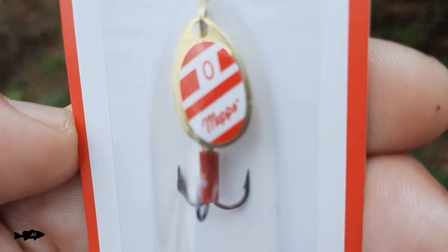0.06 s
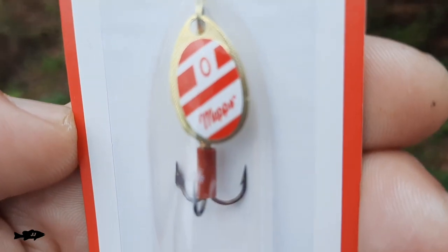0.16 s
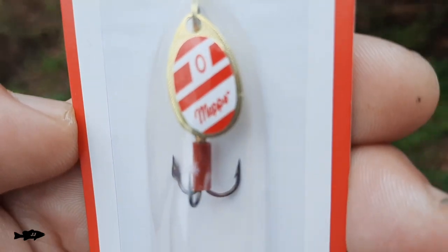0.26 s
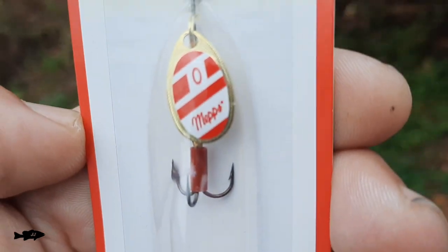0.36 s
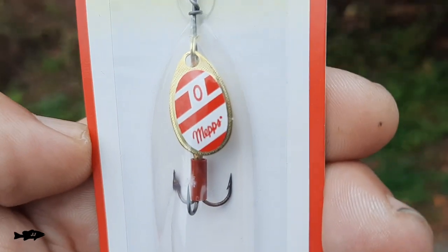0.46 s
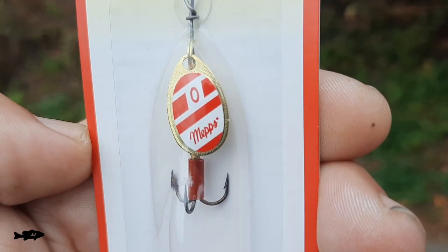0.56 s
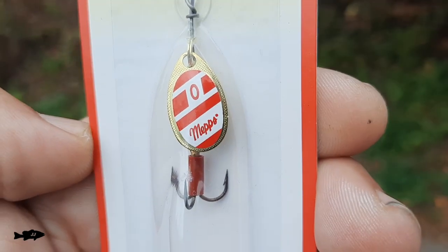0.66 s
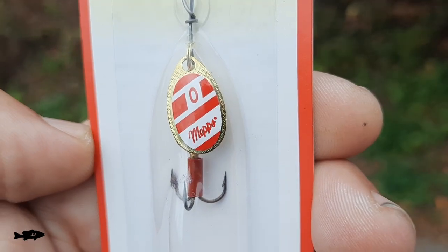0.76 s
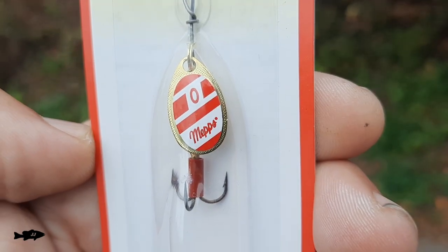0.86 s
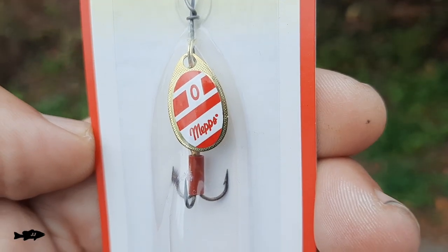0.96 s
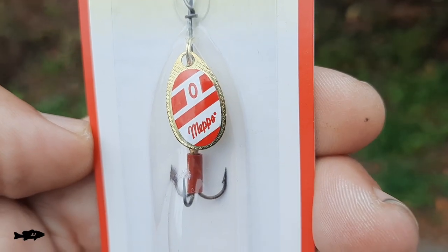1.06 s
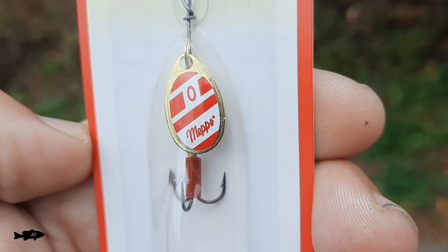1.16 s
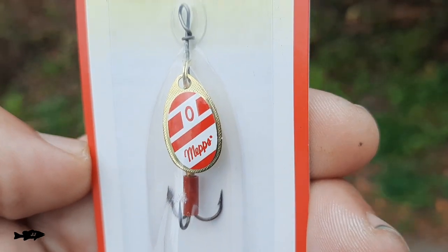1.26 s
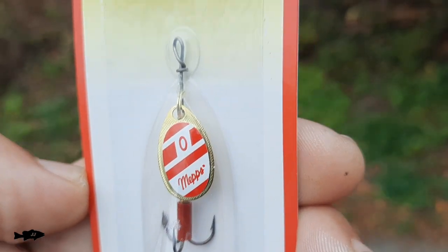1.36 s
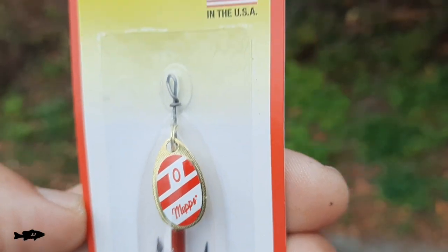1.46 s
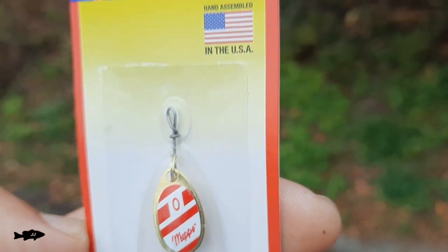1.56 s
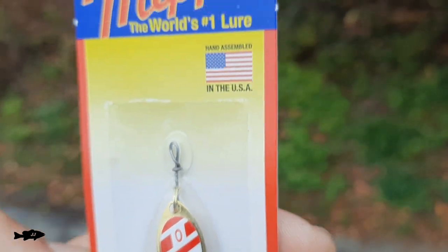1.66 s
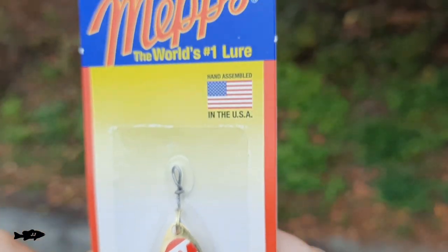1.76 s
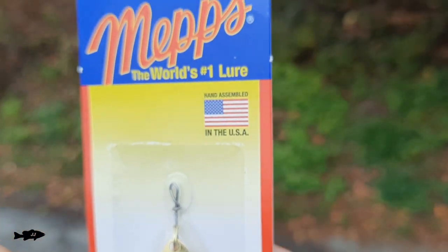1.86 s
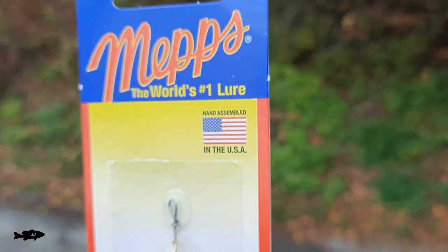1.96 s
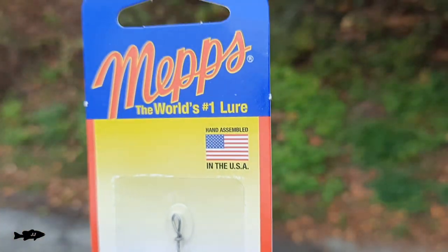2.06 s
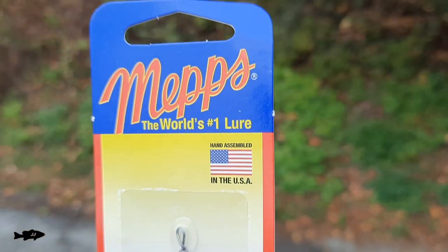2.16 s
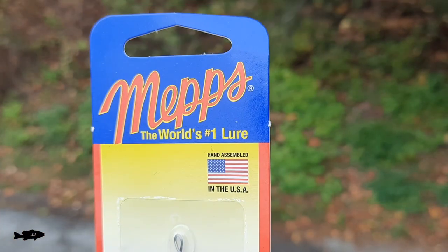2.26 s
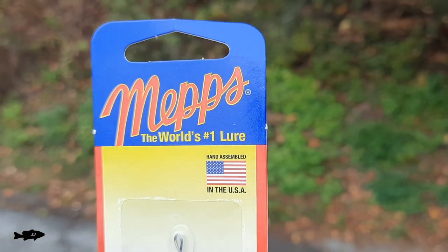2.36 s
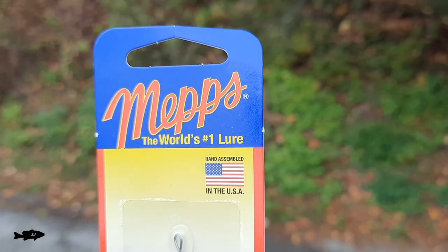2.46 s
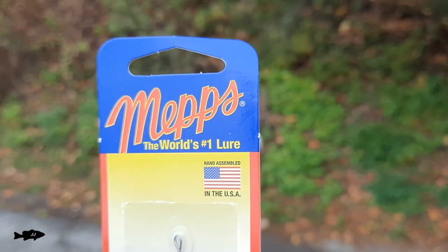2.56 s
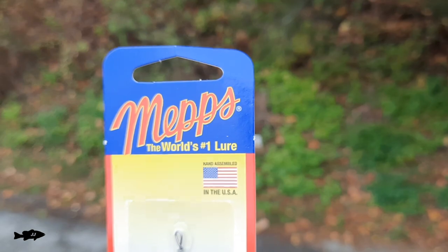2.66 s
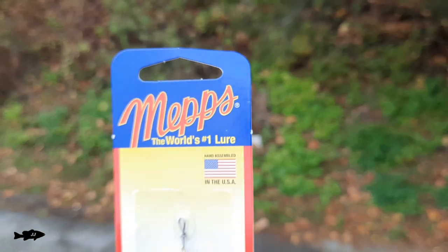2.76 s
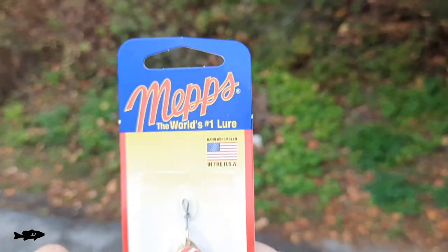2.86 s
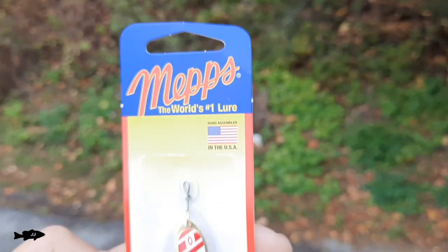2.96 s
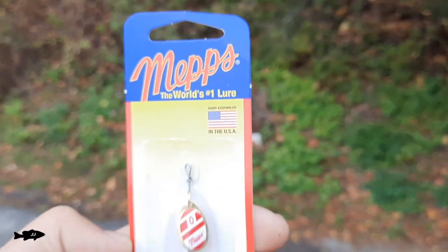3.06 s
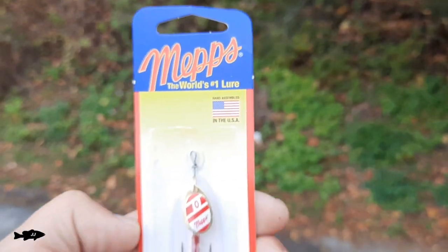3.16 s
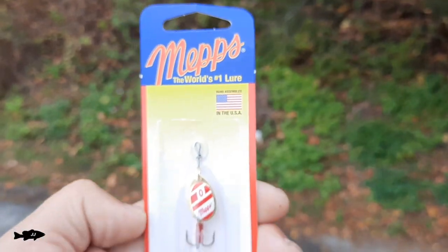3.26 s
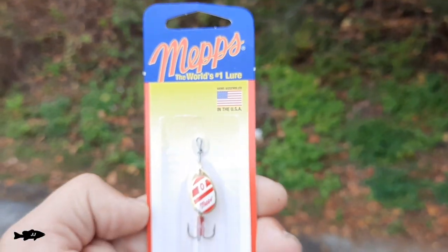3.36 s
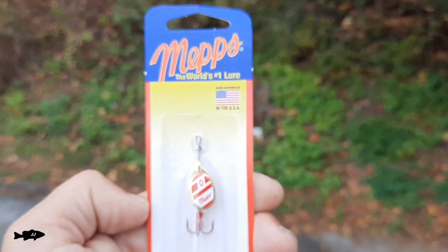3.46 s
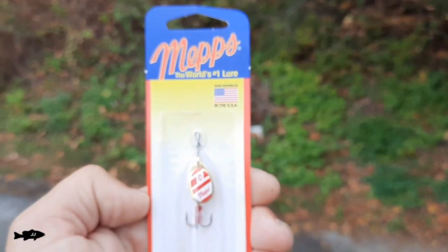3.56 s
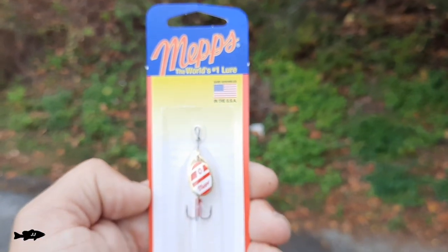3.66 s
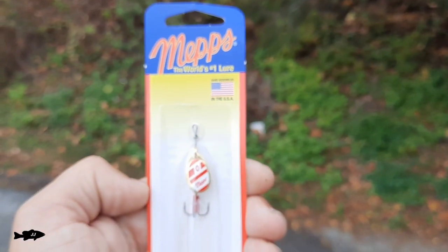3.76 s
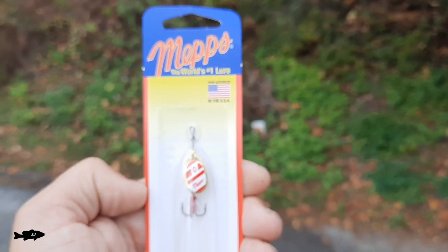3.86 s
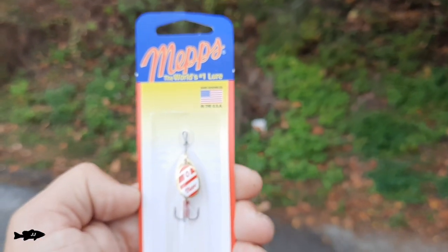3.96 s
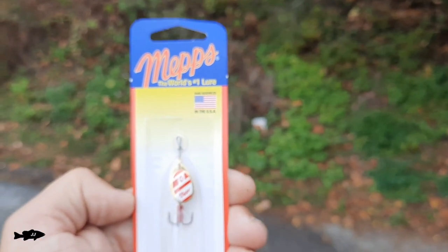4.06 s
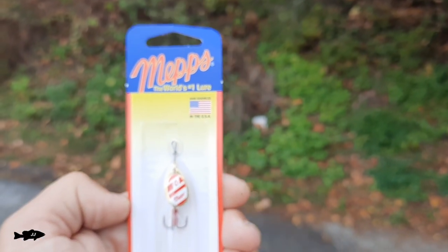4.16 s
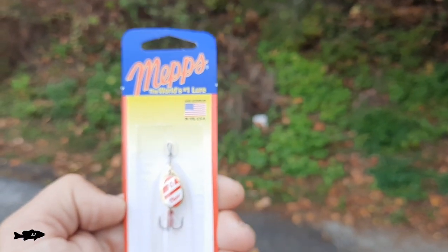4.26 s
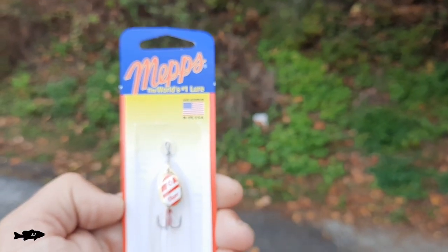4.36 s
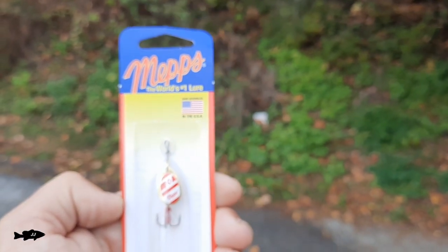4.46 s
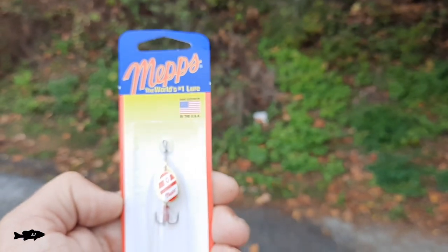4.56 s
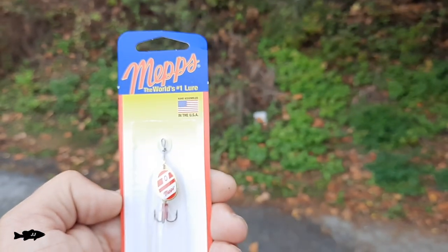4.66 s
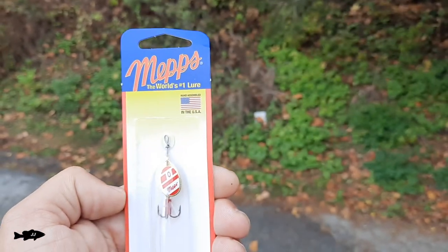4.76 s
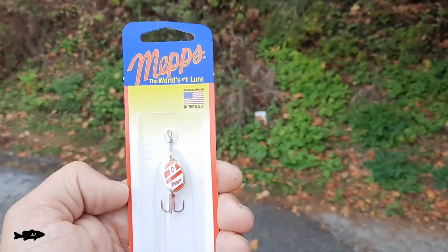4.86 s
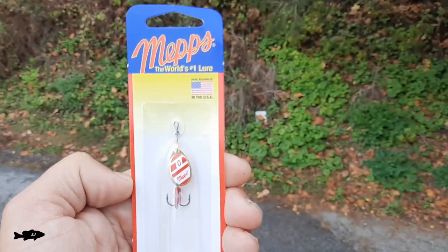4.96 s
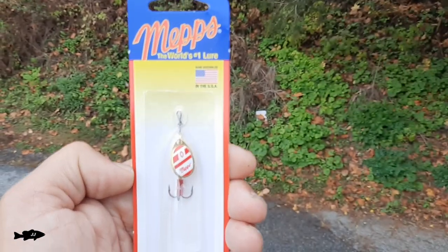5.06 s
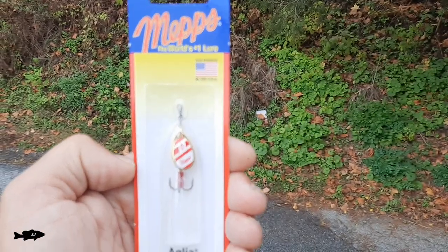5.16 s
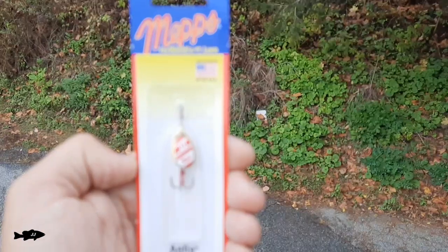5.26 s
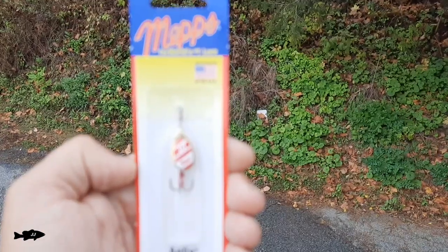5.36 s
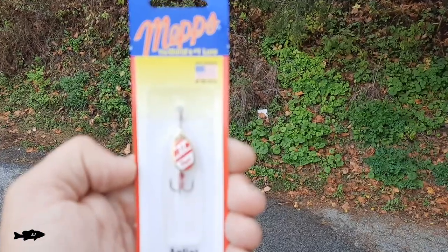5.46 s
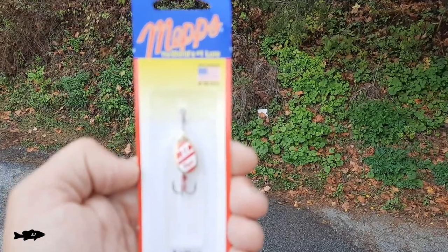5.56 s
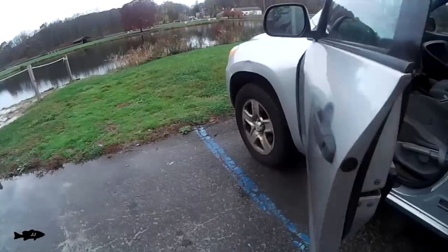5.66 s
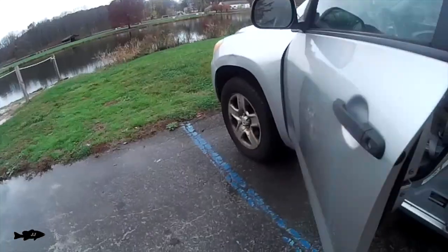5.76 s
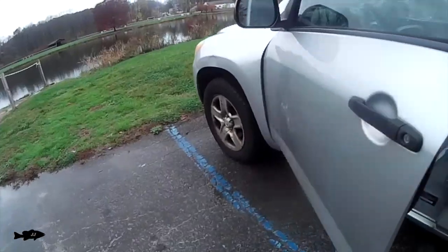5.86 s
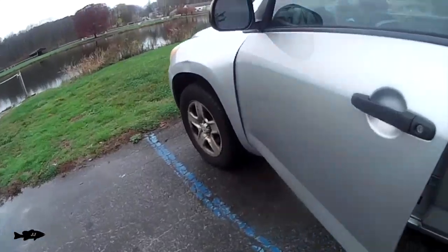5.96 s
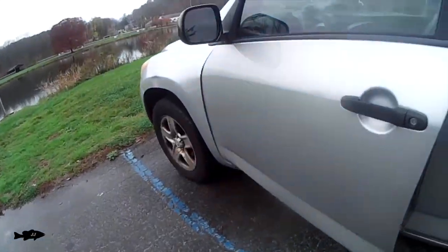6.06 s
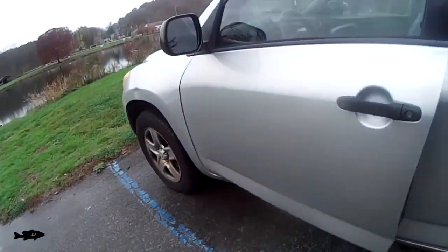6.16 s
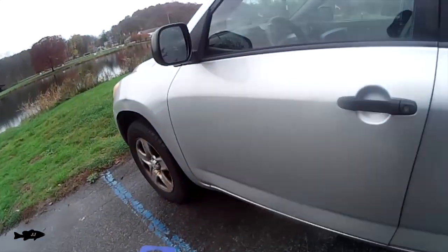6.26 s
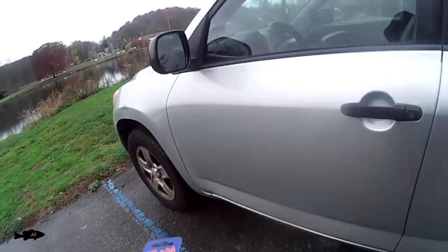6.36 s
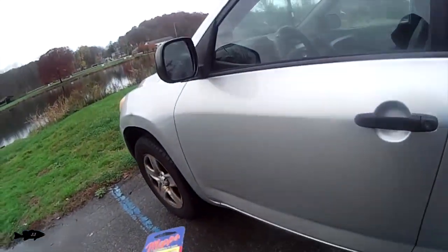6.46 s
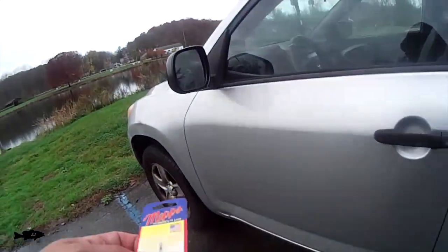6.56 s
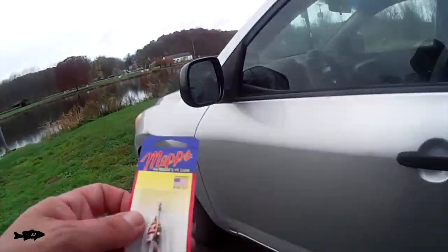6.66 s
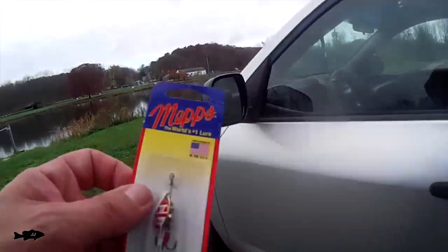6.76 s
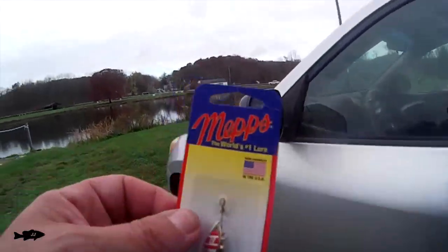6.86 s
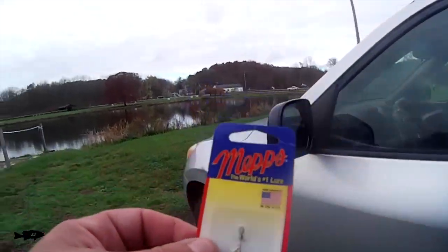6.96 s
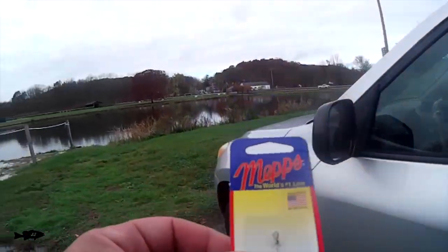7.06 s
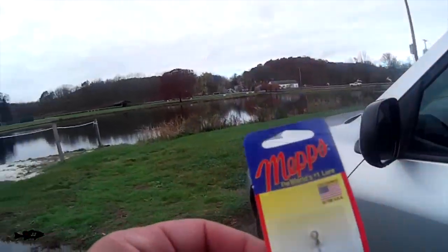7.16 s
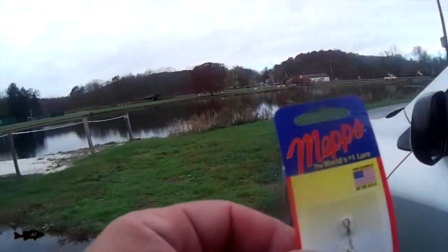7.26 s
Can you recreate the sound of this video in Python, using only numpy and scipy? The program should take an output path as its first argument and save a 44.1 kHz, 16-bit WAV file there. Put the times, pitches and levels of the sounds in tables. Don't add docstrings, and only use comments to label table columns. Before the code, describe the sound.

Tyre roar swells and fades over distant traffic and faint crickets, then cuts to a hushed car park with a loud, clipping door slam.

```python
import sys
import numpy as np
from scipy import signal
from scipy.fft import rfft, irfft, next_fast_len
from scipy.io import wavfile
from scipy.ndimage import uniform_filter1d, map_coordinates

SR = 44100
rng = np.random.default_rng(int(sys.argv[2]) if len(sys.argv) > 2 else 0)


def materialize(psi):
    bounded = np.clip(np.atleast_2d(psi).T, -1, 1)
    quanta = np.round(bounded * 32767).astype(np.int16)
    wavfile.write(sys.argv[1], SR, quanta)


def boost_factor(decibels):
    exponent = np.asarray(decibels, float) / 20
    return 10 ** exponent


N = 322659


def unit(x):
    return x / np.sqrt(np.mean(x ** 2) + 1e-20)


def along(points, hz, axis=1):
    p = np.array(points)
    return np.interp(np.log(hz + 1), np.log(p[:, 0] + 1), p[:, axis])


def curve(points):
    return np.interp(np.arange(N) / SR, *np.transpose(points))


def wobble(rate):
    knots = rng.standard_normal(int(N * rate / SR) + 4)
    return map_coordinates(knots, [np.arange(N) * rate / SR])


def filtered(x, response):
    m = next_fast_len(x.shape[-1] + 8192)
    return irfft(rfft(x, m) * response(np.fft.rfftfreq(m, 1 / SR)), m)[..., :x.shape[-1]]


def add(track, s, piece):
    part = track[..., round(s * SR):][..., :piece.shape[-1]]
    part += piece[..., :part.shape[-1]]


# Hz, direct sound 0-1, scattered sound 0-1.
LIKENESS = [(80, 1, 0.87), (404, 0.78, 0.97), (633, 0.45, 0.03), (1280, 1, 0.16), (1890, 0.58, 0),
            (5000, 0.45, 0.3), (9000, 0, 0), (14000, .1, 0.1)]


def rush(spectrum, direct, patchy_db, away=None, going=((0, 0),)):
    hz, t, z = signal.stft(rng.standard_normal((2, N)), SR, nperseg=1024)
    patches = uniform_filter1d(rng.standard_normal(z.shape[1:]), size=8, axis=0)
    patches = uniform_filter1d(patches, size=7, axis=1)
    share = np.clip(np.interp(t, *np.transpose(direct)), 0, 1)
    alike = along(LIKENESS, hz)[:, None] * share
    alike += along(LIKENESS, hz, axis=2)[:, None] * (1 - share)
    turn = np.arccos(np.clip(alike, 0, 1)) / 2
    gone = np.clip(np.interp(t, *np.transpose(going)), 0, 1)
    colour_db = np.outer(along(spectrum, hz), 1 - gone) + np.outer(along(away or spectrum, hz), gone)
    colour = boost_factor(colour_db)
    colour /= np.linalg.norm(colour, axis=0)
    mid, side = z * colour * boost_factor(patchy_db * unit(patches)) * [np.cos(turn), np.sin(turn)]
    return unit(signal.istft(np.array([mid + side, mid - side]), SR, nperseg=1024)[1][:, :N])


# Hz, share of the full lag 0-1.
PHONE_LAG = [(100, 0.2), (430, 0.4), (600, 0.91), (1000, 1.07), (1700, 0.96)]
# Hz, left over right in dB.
PHONE_SHADE = [(60, 0), (92, -2.5), (140, -0.5), (210, -0.5), (330, -0.5), (500, 6.5), (770, 1), (1170, 1),
               (1790, -2.5), (2740, 0.5), (4190, 1.5), (6410, 5), (9810, 1), (15000, 0)]


def phone(x, lag_s):
    def half(f):
        shade = along(PHONE_SHADE, f) / 2 * np.log(10) / 20
        return shade - 1j * np.pi * f * lag_s * along(PHONE_LAG, f)
    return filtered(x, lambda f: np.exp([half(f), -half(f)]))


# Hz, dB per Hz.
TRAFFIC_COLOUR = [(24, -46), (40, -12), (91, -1), (396, -9.5), (606, -13), (797, 1.5), (1130, -7),
                  (1860, -9), (3220, -23.5), (3560, -22.5), (4130, -28), (6000, -33.5), (9400, -44),
                  (12400, -41.5), (15500, -57)]


def far_traffic():
    return phone(boost_factor(-56.5) * rush(TRAFFIC_COLOUR, [(0, 0.31)], patchy_db=2.0), lag_s=-0.000537)


# Hz, dB per Hz.
INPUT_COLOUR = [(6000, -24), (9000, -10), (11000, -1), (13000, 2), (15600, 6)]
# time in seconds, level in dB.
INPUT_DB = [(0, -100), (1.5, -92), (3, -81), (4, -80), (5.6, -79)]


def input_hiss():
    return boost_factor(curve(INPUT_DB)) * rush(INPUT_COLOUR, [(0, 0), (8, 0.0047)], patchy_db=0.8)


# chirp period in seconds, chirp length in seconds, pitch in Hz, left over right in dB,
# pitch sag at the chirp ends 0-1.
CRICKETS = [
    (.0978, .035, 5950, 6, .06),
    (.0913, .03, 6120, 6, .07),
    (.09134, .025, 6450, 3, .08),
    (.0979, .028, 6050, 3, .06),
    (.0422, .038, 3480, 0, .006),
    (.02, .03, 3900, 0, .12),
    (.0418, .046, 3480, 0, .004),
]
# cricket index, start in seconds, end in seconds, level in dB at start, level in dB at end.
CHIRP_BOUTS = [(0, .083, 1.3, -85, -75), (1, .07, 1.3, -85, -75), (2, 3.054, 5.1, -66, -68),
               (2, 5.155, 5.6, -74, -73), (3, 3.232, 5.6, -71.5, -73), (6, 0, .01, -72, -72),
               (6, .032, .36, -71.5, -77), (6, .369, .38, -73, -73), (4, 4.961, 5.03, -65, -64),
               (4, 5.043, 5.45, -61, -61), (5, 4.235, 4.27, -66, -65)]


def crickets():
    out = np.zeros((2, N))
    teeth_hz, teeth_depth = 140, 0.31
    for cricket, start, end, first_db, last_db in CHIRP_BOUTS:
        period, length, hz, pan_db, sag = CRICKETS[cricket]
        t = np.arange(round(length * SR)) / SR
        swell = np.sin(np.pi * t / length)
        sides_db = np.array([[pan_db / 2], [-pan_db / 2]])
        for s in np.arange(start, end, period):
            scatter = rng.standard_normal(3)
            rasp = 1 + teeth_depth * np.sin(2 * np.pi * teeth_hz * t + 2 * scatter[2])
            pitch_hz = hz * (1 + 0.003 * scatter[0] - sag * (1 - swell))
            db = np.interp(s, [start, end], [first_db, last_db]) + 1.2 * scatter[1]
            chirp = rasp * swell ** 2 * np.sin(2 * np.pi * np.cumsum(pitch_hz) / SR)
            add(out, s, boost_factor(db + sides_db) * chirp)
    return out


# time in seconds, level in dB.
NEARNESS_DB = [(0, -68.5), (.5, -67), (.95, -56), (1.45, -46.5), (1.8, -43.5), (2.0, -42.5), (2.2, -37.5),
               (2.35, -37.5), (2.6, -39), (2.85, -40), (3.1, -41.5), (3.7, -44), (4.1, -43.5), (4.45, -46),
               (4.65, -48), (5.1, -50), (5.6, -52)]
# time in seconds, share 0-1.
DIRECT_SHARE = [(0, 0.4), (1, 0.71), (2.8, 0.68), (3.3, 0.35), (5.6, 0)]
# time in seconds, share 0-1.
TURNED_AWAY = [(0, 0.32), (2, 0.05), (3.1, 0.36)]
# time in seconds, share 0-1.
AIR_DULLING = [(0, 0.45), (1.4, 0), (1.95, 0.09), (2.249, 0.05), (2.55, 0.05), (3.1, 0.12)]
# Hz, dB per Hz.
RUMBLE = [(20, -34), (40, -19), (70, 10), (110, 11), (150, 3.5), (220, -61)]
BOOM = [(50, -48), (100, -25), (150, -2.5), (250, -4.5), (345, 2.5), (430, -2), (560, -3.5), (680, -10),
        (850, -62)]
ROAR = [(450, -45), (620, -4.5), (800, 0.5), (1050, -6.5), (1400, -7), (1800, -11.5), (2300, -14.5),
        (2900, -22.5), (3600, -46)]
HISS = [(50, -80), (150, -19), (2000, -19), (2700, -5), (3500, 2.5), (4500, -6.5), (6200, -8),
        (7300, -13.5), (8400, -13), (9500, -20), (10800, -18), (12000, -19), (13500, -37), (15500, -47)]
BOOM_BEHIND = [(50, -45), (100, -5), (165, 3), (250, -8), (335, -1), (430, -1), (540, -9), (650, -23),
               (850, -64)]
ROAR_BEHIND = [(480, -59), (650, -13), (770, 6.5), (950, -1.5), (1150, 13), (1260, -3), (1340, -13.5),
               (1700, -5.5), (2300, -17), (2900, -16.5), (3600, -71)]
HISS_BEHIND = [(50, -30), (150, 26), (2000, 32), (2700, 27), (3500, 3), (4500, -10.5), (6200, -20.5),
               (7300, -19), (8400, -28), (9500, -43), (11000, -57), (15500, -50)]
# level over the roar when nearest in dB, swing coming, swing going (dB per dB of nearness),
# unevenness in dB.
NOISE_LAYERS = [
    (-9, 0.67, 1.34, 2),
    (2, 0.88, 1.176, 1.5),
    (3, 0.86, 0.98, 0.7),
    (-15, 0.86, 1.15, 0.84),
]


def car_noise():
    t = np.arange(N) / SR
    near_db = curve(NEARNESS_DB)
    top_db = near_db.max()
    going = t > t[near_db.argmax()]
    spray_db = 3.5 * np.exp(-((t - 2.47) / 0.22) ** 2)
    sources = [(RUMBLE, RUMBLE, TURNED_AWAY, 1.5, 0), (BOOM, BOOM_BEHIND, TURNED_AWAY, 0.21, 0),
               (ROAR, ROAR_BEHIND, TURNED_AWAY, 0.54, 0), (HISS, HISS_BEHIND, AIR_DULLING, 0.86, spray_db)]
    noise = 0
    for (over_db, coming, leaving, uneven_db), source in zip(NOISE_LAYERS, sources):
        colour, behind, turning, patchy_db, extra_db = source
        swing_db = np.where(going, leaving, coming) * (near_db - top_db)
        db = top_db + over_db + swing_db + uneven_db * wobble(9) + extra_db
        noise = noise + boost_factor(db) * rush(colour, DIRECT_SHARE, patchy_db, behind, turning)
    return noise


# time in seconds, peak in dB, pitch in Hz.
CARD_TICKS = [
    (0.5406, -65, 10200),
    (0.767, -62, 7270),
    (1.1272, -65, 8870),
]


def card_ticks():
    out = np.zeros((2, N))
    t = np.arange(200) / SR
    for s, db, hz in CARD_TICKS:
        add(out, s, boost_factor(db + 5 - 60 * t / 0.003) * np.sin(2 * np.pi * hz * t) * np.ones((2, 1)))
    return out


def tone(hz, db, drift_hz, flutter_db):
    level = boost_factor(db + flutter_db * wobble(18)) * np.sqrt(2)
    return level * np.sin(2 * np.pi * np.cumsum(hz + drift_hz * wobble(25.21)) / SR)


def swells(rows, fall_db):
    t = np.arange(N) / SR
    return np.max([db - fall_db * ((t - s) / half) ** 2 for s, half, db in rows], axis=0).clip(-150)


HUM_HZ = 339.8


def doppler_hum_hz():
    shift_hz, abeam_s, sweep_s = 17, 2.9, 1.7
    past_s = np.arange(N) / SR - abeam_s
    return HUM_HZ - shift_hz * past_s / np.hypot(past_s, sweep_s)


# middle in seconds, half length in seconds, level in dB.
HUM_SWELLS = [
    (1.15, 0.091, -56),
    (2.1, 0.086, -37.5),
    (2.5, 0.27, -43),
    (2.85, 0.087, -39.5),
    (3.8, 0.56, -45.5),
    (4.3, 0.21, -42.5),
    (5.0, 0.12, -53),
    (5.55, 0.32, -54),
]


def tyre_hum(hum_hz):
    t = np.arange(N) / SR
    drift_hz = np.interp(t, [3.1, 3.5], [24, 1.5])
    flutter_db = np.interp(t, [3.1, 3.5], [4, 1.1])
    return tone(hum_hz, swells(HUM_SWELLS, fall_db=4.5), drift_hz, flutter_db)


# middle in seconds, half length in seconds, level in dB.
ENGINE_SWELLS = [
    (1.35, 0.17, -56.5),
    (1.96, 0.087, -46.5),
    (2.21, 0.13, -44),
    (2.62, 0.072, -39),
    (3.2, 0.51, -49.5),
    (3.65, 0.073, -53),
    (4.08, 0.094, -51),
]


def engine(hum_hz):
    firing_hz = 69.3 * hum_hz / HUM_HZ + 1.8 * wobble(4)
    return tone(firing_hz, swells(ENGINE_SWELLS, fall_db=6), drift_hz=9, flutter_db=3.5)


# middle in seconds, half length in seconds, level in dB.
WHINE_SWELLS = [
    (1.48, 0.13, -46.5),
    (1.751, 0.09, -49),
]


def tread_whine(hum_hz):
    whine_hz = 422 * hum_hz / hum_hz[round(1.6 * SR)]
    return tone(whine_hz, swells(WHINE_SWELLS, fall_db=6), drift_hz=28, flutter_db=3)


def band(hz, width_hz, db):
    slow = filtered(rng.standard_normal((2, N)), lambda f: np.exp(-(2 * f / width_hz) ** 2))
    turn = 2 * np.pi * np.cumsum(hz) / SR
    return boost_factor(db) * unit(slow[0] * np.cos(turn) + slow[1] * np.sin(turn))


# pitch in Hz, width in Hz, middle in seconds, half length in seconds, level in dB.
GROOVES = [
    (8330, 220, 2.25, .25, -70.5),
    (6250, 380, 2.6, .42, -68),
    (4260, 350, 2.5, 0.39, -69),
    (10500, 350, 2.4, .4, -80),
]


def groove_song(hum_hz):
    glide = (hum_hz / np.interp(2.2, np.arange(N) / SR, hum_hz)) ** 4.5
    out = 0
    for hz, width_hz, *swell in GROOVES:
        out = out + band(hz * glide, width_hz, swells([swell], fall_db=4) + 1.5 * wobble(12))
    return out


# middle in seconds, half length in seconds, level in dB.
GEAR_SWELLS = [
    (4, 0.47, -55.5),
    (4.95, 0.21, -56),
]


def gear_train(hum_hz):
    return tone(hum_hz / 2, swells(GEAR_SWELLS, fall_db=6), drift_hz=4, flutter_db=3)


def car():
    hum_hz = doppler_hum_hz()
    tones = tyre_hum(hum_hz) + engine(hum_hz) + tread_whine(hum_hz) + gear_train(hum_hz)
    return car_noise() + tones + groove_song(hum_hz)


def road():
    x = far_traffic() + input_hiss() + crickets() + phone(car(), lag_s=0.000473) + card_ticks()
    return filtered(x, lambda f: boost_factor(-1.5 * np.exp(-((f - 9530) / 350) ** 2)))


# Hz, dB per Hz.
PARK_COLOUR = [(12, -33), (22, -4), (86, -5), (125, -4.5), (240, -4), (360, -7.5), (520, -12.5),
               (1000, -15.5), (1350, -15.5), (1800, -18), (2200, -27.5), (3500, -33), (11600, -38.5),
               (14500, -38)]


def park_air():
    late_s = np.arange(N) / SR - 6.82
    db = -53 - 5 * late_s.clip(0) + 0.5 * np.exp(-(late_s / 0.037) ** 2)
    return boost_factor(db + 0.26 * wobble(6)) * rush(PARK_COLOUR, [(0, 0.0046), (8, 0.01)], patchy_db=1.55)[0]


def resonant(x, modes):
    def response(f):
        total = 0
        for k, (c, w, db) in enumerate(modes):
            total = total + (-1) ** k * boost_factor(db) * 1j * f * w / (c * c - f * f + 1j * f * w)
        return total
    return filtered(x, response)


# pitch in Hz, width in Hz, level in dB.
CASE_MODES = [(1670, 1200, 5), (2750, 1500, -7), (3950, 680, 3.5), (7800, 2300, -8)]
# time in seconds, peak in dB, brightness in dB.
CARD_CLICKS = [(5.6747, -38.5, -20), (5.6874, -50, -18), (5.9635, -48, -17), (6.7065, -45, -17),
               (6.717, -47, -5), (6.7305, -46.5, 4), (6.7355, -55, 8), (6.746, -59, 5), (6.7785, -57, 3),
               (6.8042, -32, -16), (6.8414, -54, -4), (6.857, -56, -11), (6.8844, -58, -4),
               (6.9074, -57, -9), (6.993, -57, -6)]
# start in seconds, length in seconds, level in dB,
# main ring in Hz, brightness in dB.
CARD_RUBS = [
    (5.935, .032, -56, 1790, -25),
    (6.665, .065, -56, 2800, -13),
    (6.675, .085, -69, 5500, 0),
    (6.78, .14, -77, 4000, 2),
    (6.698, .03, -54, 1700, -10),
    (6.984, .022, -60.5, 3700, -12),
    (6.995, .052, -52, 1700, -13),
    (7.008, .03, -63.5, 7500, 0),
    (7.002, .042, -56.5, 4000, -12),
]
# time in seconds, level in dB, pitch in Hz.
CAMERA_BUMPS = [
    (6.792, -42, 37.4),
    (6.835, -45, 24),
    (6.873, -41, 40),
    (7.25, -47, 40),
    (7.29, -49, 45),
]


def hand():
    knock, bright, rest = np.zeros((3, N))
    t = np.arange(900) / SR
    for s, db, bright_db in CARD_CLICKS:
        shape = boost_factor(db - 60 * t / 0.015) * (1 - np.exp(-t / 0.0012))
        ring = 1.2 * np.sin(2 * np.pi * CASE_MODES[0][0] * t)
        add(knock, s, shape * (ring + 2 * rng.standard_normal(len(t))))
        add(bright, s, 4 * boost_factor(bright_db) * shape * rng.standard_normal(len(t)))
    for s, length, db, hz, bright_db in CARD_RUBS:
        n = round(length * SR)
        roughness = rng.gamma(12, 0.08, n // 40 + 40).repeat(40)[:n + 900]
        grains = rng.standard_normal((2, n + 900)) * roughness
        stroke = np.pad(boost_factor(db) * np.sin(np.pi * (np.arange(n) / n) ** 1.07) ** 2, (0, 900))
        rub = resonant(stroke * grains[0], [(hz, 300 + hz / 9, 0)])
        add(rest, s, 5 * resonant(rub, [(hz, 450 + hz / 7, 0)]))
        add(bright, s, 3 * boost_factor(bright_db) * stroke * grains[1])
    for s, db, hz in CAMERA_BUMPS:
        cycles = np.arange(round(1.5 * SR / hz)) * hz / SR
        add(rest, s, boost_factor(db) * np.sin(np.pi * cycles / 1.5) ** 2 * np.sin(2 * np.pi * cycles))
    knock = resonant(resonant(knock, CASE_MODES[:2]), [(1900, 3200, 0)])
    knock = resonant(knock, [(2000, 4000, 0)])
    bright = resonant(resonant(bright, CASE_MODES[2:]), [(5470, 27000, 0)])
    return knock + bright + rest


# pitch in Hz, level in dB, t60 in seconds.
SKIN_MODES = [(47.4, -6, 0.21), (80.3, -19, 0.64), (173.3, -3.5, 0.18), (200.4, -7, 0.28),
              (269, -2.5, 0.26), (291.3, -6.5, 0.29), (343, -4, 0.41), (489, -7, 0.17), (514, -12, 0.17),
              (634, -7, 0.16), (788, -13, 0.13), (1080, -21, 0.4), (1690, -27, 0.18), (1706, -20, 0.17)]


def skin_ring(t):
    modes = np.array([boost_factor(db - 60 * t / t60) * np.sin(2 * np.pi * hz * t) for hz, db, t60 in SKIN_MODES])
    return boost_factor(2.5 * rng.standard_normal(len(modes))) @ modes


# Hz, dB per Hz.
SHELL_COLOUR = [(15, -31), (25, -13), (126, -8), (164, 4), (344, 0.5), (392, -13), (448, -3), (632, -6),
                (1020, -14.5), (1920, -18.5), (2380, -34), (4140, -36), (14000, -81)]
# Hz, t60 in seconds.
SHELL_T60_S = [(60, 0.091), (300, 0.38), (1000, 0.29), (3000, 0.17), (8000, 0.13), (13000, 0.26)]


def shell_rattle(t):
    hz, frames, z = signal.stft(rng.standard_normal(len(t)), SR, nperseg=256)
    dying_db = along(SHELL_COLOUR, hz)[:, None] - 60 * frames / along(SHELL_T60_S, hz)[:, None]
    rattle = signal.istft(z * boost_factor(dying_db), SR, nperseg=256)[1][:len(t)]
    return rattle / rattle[:4000].std()


# Hz, dB per Hz.
CRACK_COLOUR = [(500, -1.5), (900, -5), (1300, -12.5), (1750, -4), (2200, -10.5), (2700, -11.5),
                (3300, -24), (4100, -18), (5500, -28.5), (8000, -37.5), (12000, -46), (14000, -73)]


def latch_crack(t, bright_db):
    def colour(f):
        return boost_factor(along(CRACK_COLOUR, f) + bright_db / (1 + (2980 / (f + 1)) ** 4))
    crack = unit(filtered(rng.standard_normal(len(t)), colour))
    crack += 0.4 * np.sin(2 * np.pi * 1740 * t)
    decay = boost_factor(-60 * t / 0.02) + 0.21 * boost_factor(-60 * t / 0.18)
    return (1 - np.exp(-t / 0.0014)) * crack * decay


# time in seconds, panel in dB, latch crack in dB,
# crack brightness in dB.
DOOR_CONTACTS = [(6.2904, -44, -23.5, -8), (6.2923, -25.5, -38, -14), (6.3053, -30, -24, 10),
                 (6.308, -36, -20, 10), (6.3133, -19, -9.5, 1), (6.3236, -31, -12.5, -1),
                 (6.3385, -15, -23, 3), (6.3432, -22.5, -6, -3), (6.353, -20, -27, 2),
                 (6.364, -18.5, -24, -3), (6.3774, -19, -26, 7), (6.3843, -19, -24, 3),
                 (6.3895, -28, -15.5, -8), (6.401, -38, -24, -2), (6.407, -32, -26, -10),
                 (6.422, -28, -30, -5), (6.455, -31, -31, 0), (6.4638, -32.5, -28.5, 2),
                 (6.4714, -32, -27, -3), (6.5, -36, -37, 2), (6.522, -38, -40, 3), (6.5494, -41, -43, 2)]
# time in seconds, level in dB, pitch in Hz, t60 in seconds.
FRAME_THUDS = [(6.2927, -14.5, 526, 0.034), (6.293, -16.5, 350, .04), (6.312, -23, 66, 0.14),
               (6.3137, -5.5, 470, 0.029), (6.314, -9, 856, 0.023), (6.3145, -14.5, 1210, 0.023),
               (6.3274, -9, 320, 0.022), (6.3396, -7.5, 168, 0.037), (6.344, 4.5, 403, .02),
               (6.3445, -6.5, 723, 0.028), (6.379, -11, 260, .04), (6.3843, -9, 426, 0.027),
               (6.407, -25, 400, 0.026), (6.4637, -24, 562, .04), (6.4716, -23, 480, .03)]


def door():
    out, t = np.zeros(N), np.arange(SR * 2 // 5) / SR
    soft = 1 - np.exp(-t / 0.004)
    for s, panel_db, crack_db, bright_db in DOOR_CONTACTS:
        panel = boost_factor(-5.0) * skin_ring(t) + boost_factor(-9.5) * shell_rattle(t)
        add(out, s, boost_factor(panel_db) * soft * panel)
        add(out, s, boost_factor(crack_db - 3.5) * latch_crack(t, bright_db))
    for s, db, hz, t60 in FRAME_THUDS:
        add(out, s, -boost_factor(db - 60 * t / t60) * np.sin(2 * np.pi * hz * t) * (1 - np.exp(-t / 0.0017)))
    push = boost_factor(-16.5) * np.exp(-(t / 0.065) ** 2) * np.sin(2 * np.pi * 27 * t)
    add(out, 6.3085, push)
    return out


def car_park():
    x = filtered(park_air() + hand() + door(), lambda f: 1j * f / (12 + 1j * f))
    x = x / (1 + np.abs(x / 0.495) ** 20) ** (1 / 20)
    return filtered(x, lambda f: 1 / (1 + (f / 13900) ** 80))


def scene():
    change_s, fade_s = 5.613, 0.0028
    after = np.clip((np.arange(N) / SR - change_s) / fade_s, 0, 1)
    return (1 - after) * road() + after * car_park()


def band_limit(x):
    return signal.sosfilt(signal.butter(12, 15700, fs=SR, output="sos"), x)


def record(dry):
    return band_limit(dry)


dry = scene()
out = record(dry)
materialize(out)
```